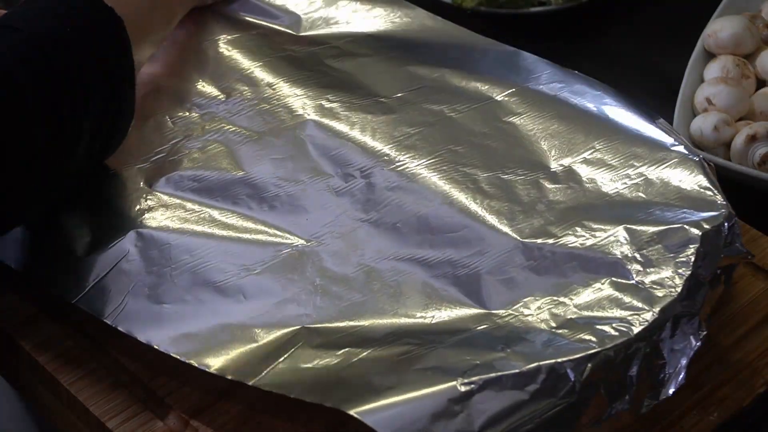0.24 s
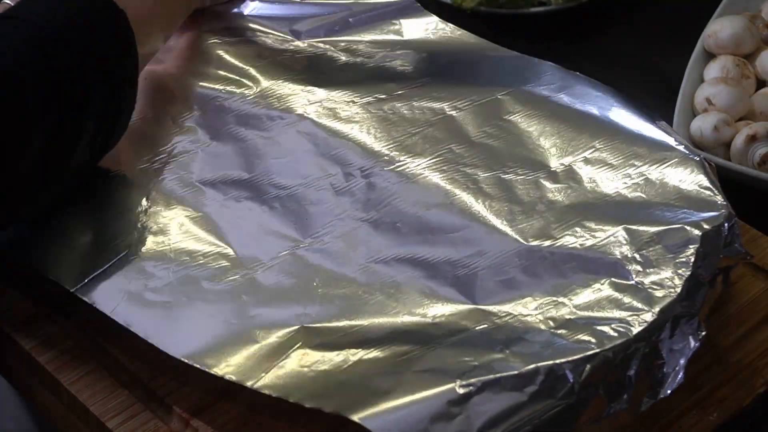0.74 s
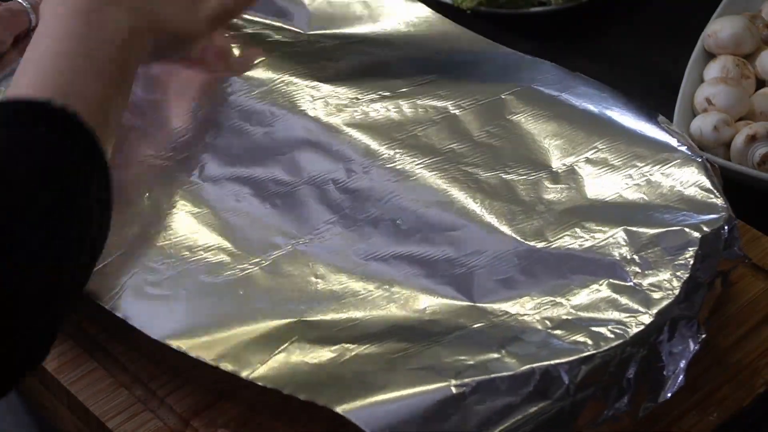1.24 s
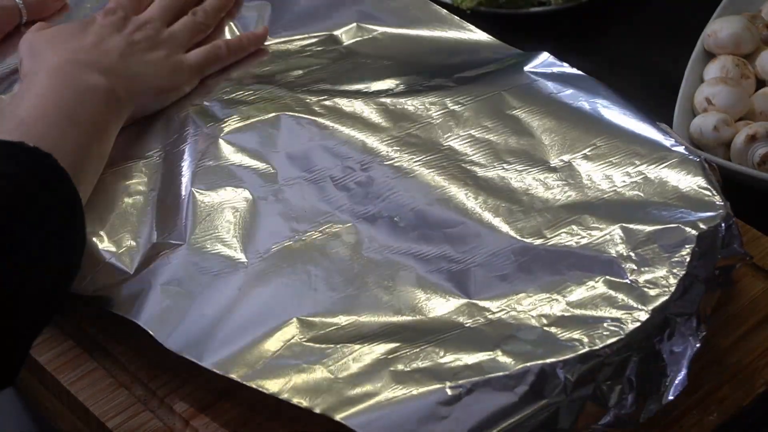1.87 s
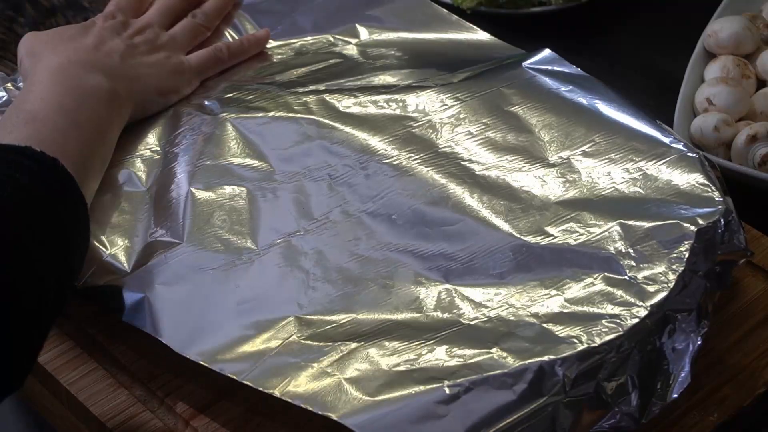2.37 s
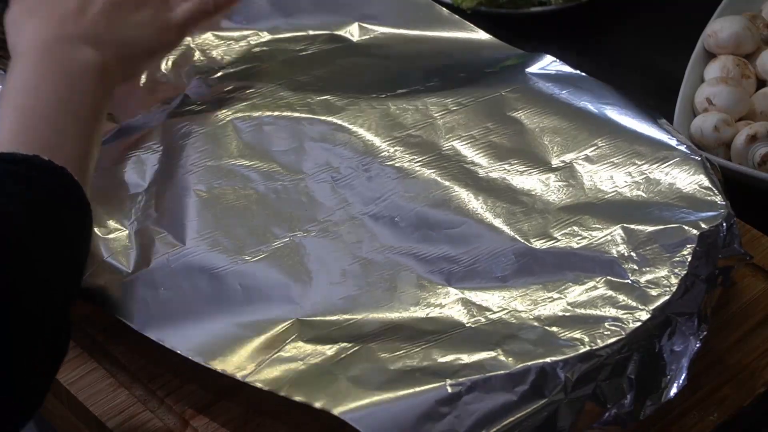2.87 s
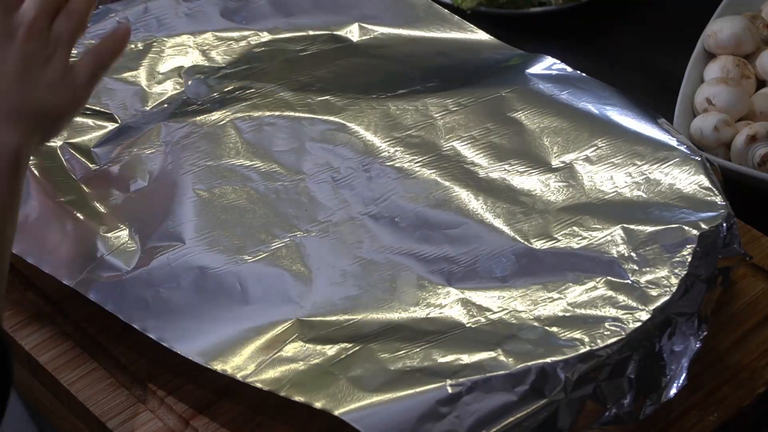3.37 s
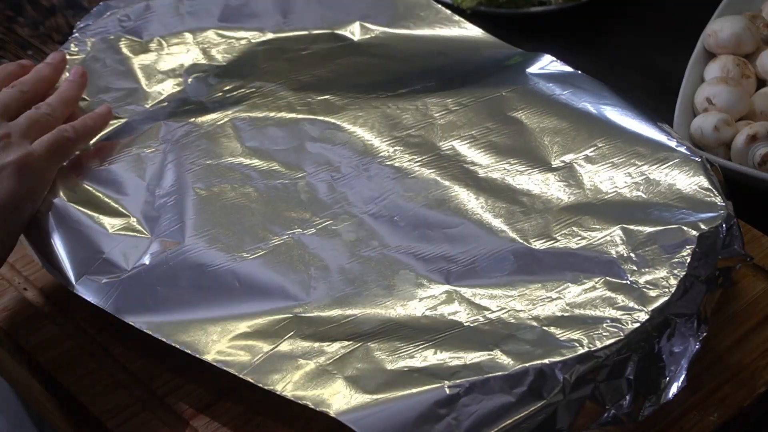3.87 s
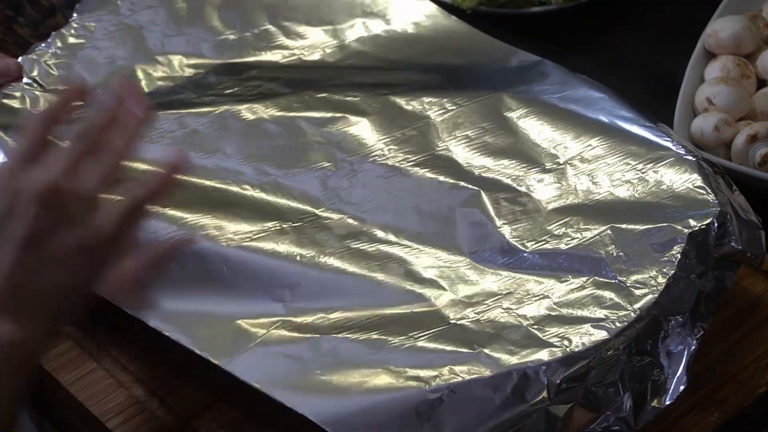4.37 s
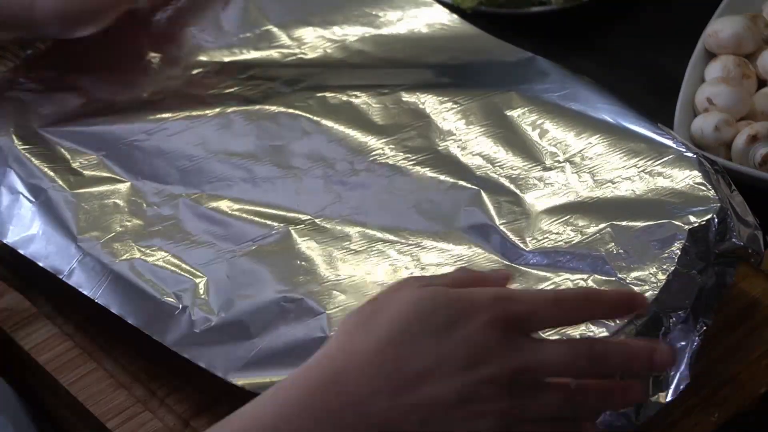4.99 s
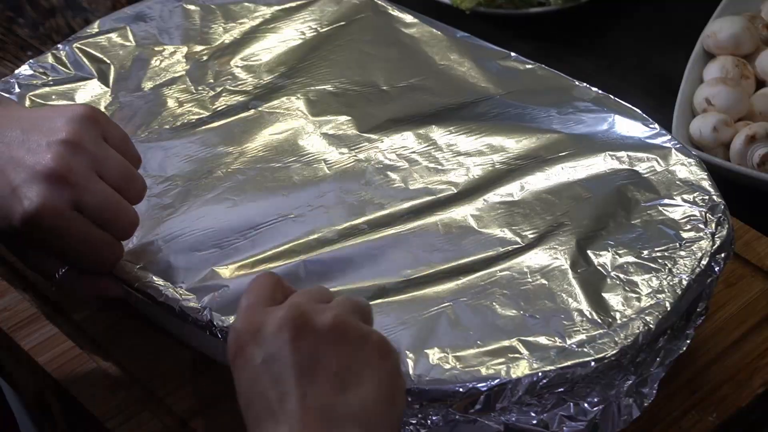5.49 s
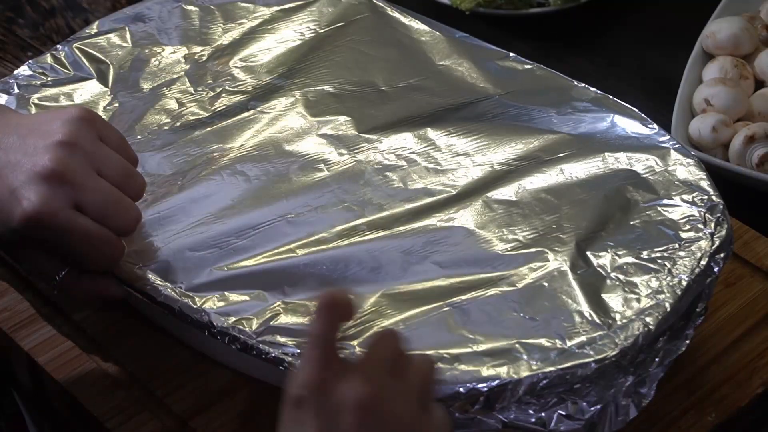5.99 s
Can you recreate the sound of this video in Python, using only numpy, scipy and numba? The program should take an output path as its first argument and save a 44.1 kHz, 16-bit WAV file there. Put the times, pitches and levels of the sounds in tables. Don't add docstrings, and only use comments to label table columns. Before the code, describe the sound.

Aluminium foil crackles and crinkles sharply in uneven bursts as hands spread and crimp it over a dish, above a low fridge hum.

```python
import sys
import numpy as np
from scipy import signal
from scipy.fft import rfft, irfft
from scipy.io import wavfile
from scipy.ndimage import uniform_filter1d
from numba import njit

SR = 44100
rng = np.random.default_rng(int(sys.argv[2]) if len(sys.argv) > 2 else 0)


def output_pcm(signal):
    pcm = np.clip(np.atleast_2d(signal).T, -1, 1) * 32767
    wavfile.write(sys.argv[1], SR, np.round(pcm).astype(np.int16))


def volts(x):
    e = np.asarray(x, float) / 20
    return 10 ** e


N = 275625

FIRM_DB = -25


def level(x, db):
    return x * volts(db) / np.sqrt(np.mean(x ** 2))


def colour(x, shape):
    hz, db = np.transpose(shape)
    bins_hz = np.fft.rfftfreq(x.shape[-1], 1 / SR)
    gain = volts(np.interp(np.log(bins_hz + 1), np.log(hz), db))
    return irfft(rfft(x) * gain, x.shape[-1])


def walk(rate):
    hold = int(SR / rate)
    steps = np.repeat(rng.standard_normal(N // hold + 1), hold)
    return 0.7 * uniform_filter1d(uniform_filter1d(steps, hold), hold)[:N]


# f/Hz, level/dB re motor line, phase waver/cycles
MOTOR_LINES = [
    (56.6, -3.5, 0.034),
    (108, -14, 0.81),
    (190, -15.5, 0.58),
    (239.4, -19, 0.3),
]
# f/Hz, level/dB per Hz
ROOM_NOISE = [(20, -25), (40, -6), (75, -3), (105, 5.5), (170, -7.5), (200, 2), (330, -5), (450, -6),
              (630, -5), (900, -6), (3000, -56), (7000, -57), (16500, -44)]
# t/s, motor line level/dB
BACKGROUND_GAIN = [(0.0, -45.5), (0.64, -44.5), (0.79, -50), (1.24, -49), (1.4, -48.5), (3.12, -47),
                   (3.31, -42.5), (3.79, -47), (4.42, -46.5), (4.53, -52.5), (5.05, -48.5), (5.17, -60.5),
                   (5.26, -43.5), (5.64, -48), (6.25, -46)]


def kitchen():
    t = np.arange(N) / SR
    hum = np.zeros(N)
    for hz, db, waver in MOTOR_LINES:
        strength = volts(db + 3.0 + 1.3 * walk(5.35))
        hum += strength * np.sin(2 * np.pi * (hz * t + waver * walk(10)))
    mid, side = colour(rng.standard_normal((2, N)), ROOM_NOISE)
    side = signal.lfilter(*signal.butter(1, 2500, "high", fs=SR), side)
    noise = level(mid + side * np.array([[1], [-1]]), -4.5)
    return volts(np.interp(t, *np.transpose(BACKGROUND_GAIN))) * (hum + noise)


GRIP_DB_PER_S, LET_GO_DB_PER_S = 900, 202
REST_DB, REST_END_S, REST_END_DB = -42.5, 4, -63
# start t/s, length/s, crackle level at start/dB, crackle level at end/dB
HAND_STROKES = [(0, 0.033, -34, -39), (0.053, 0.14, -33.5, -23.5), (.40, 0.098, -40, -37),
                (0.557, .03, -37, -38), (0.626, 0.21, -22, -32), (0.841, 0.062, -24, -28.5),
                (.97, 0.18, -32.5, -39.5), (1.236, .1, -27, -28), (1.36, 0.4, -25.5, -26),
                (1.716, 0.32, -28.5, -32), (2.05, 0.11, -23, -23), (2.211, 0.081, -31.5, -24),
                (2.414, 0.18, -40.5, -28.5), (2.657, 0.043, -37, -25), (2.845, 0.11, -30.5, -36.5),
                (3.034, 0.069, -44, -36), (3.169, 0.15, -46, -30.5), (3.328, 0.08, -39, -35),
                (3.439, 0.058, -47, -29.5), (3.563, 0.31, -32.5, -26), (3.914, 0.45, -26, -25.5),
                (4.406, 0.15, -25.5, -22), (4.578, .22, -28.5, -26), (4.997, 0.055, -37.5, -20.5),
                (5.064, 0.26, -22.5, -26), (5.36, .16, -30.5, -32), (5.544, 0.12, -24, -26.5),
                (5.725, 0.18, -29.5, -28), (5.95, 0.11, -26.5, -34), (6.241, 0.029, -26.5, -29)]


def hands():
    t = np.arange(N) / SR
    db = np.where(t < REST_END_S, 1. * REST_DB, REST_END_DB)
    for s, length, first_db, last_db in HAND_STROKES:
        glide = np.interp(t, [s, s + length], [first_db, last_db])
        grip = GRIP_DB_PER_S * (s - t).clip(0)
        let_go = LET_GO_DB_PER_S * (t - s - length).clip(0)
        db = np.maximum(db, glide - grip - let_go)
    return uniform_filter1d(db, size=400)


def creases():
    count = 120000
    when, turn, place, side = rng.random((count, 4)).T
    at = 20 + (when * N).astype(int)
    size = np.sign(turn - .5) * volts(2.3 * rng.exponential(size=count).clip(0, 6))
    lead = np.round(np.tan(np.pi * (place - .5)) * 0.32).clip(-12, 12).astype(int)
    clicks = np.zeros((2, N + 40))
    np.add.at(clicks[0], at, size * volts(3.8 * (side - .5)))
    np.add.at(clicks[1], at + lead, size / volts(4.6 * (side - .5)))
    return level(clicks[:, 20:N + 20], 0)


@njit
def ring(start, hz, t60, left, right):
    out = np.zeros((2, N))
    for k in range(len(start)):
        p, z = np.exp((2j * np.pi * hz[k] - np.log(1000) / t60[k]) / SR), 1 + 0j
        for i in range(start[k], min(N, start[k] + int(t60[k] * SR))):
            out[0, i] += (z * left[k]).imag
            out[1, i] += (z * right[k]).imag
            z *= p
    return out


def facets():
    count = 30000
    when, size, cycles, place = rng.random((count, 4)).T
    hz = 400 + 16600 * size
    t60 = np.minimum(5 * volts(-6 * np.log(1 - cycles)) / hz, .03)
    gain = volts(0.79 * rng.exponential(size=count)) / np.sqrt(t60)
    lead = np.exp(2j * np.pi * hz * 1.8e-5 * (2 * place - 1))
    return level(ring((when * N).astype(int), hz, t60, gain * lead, gain / lead), 0)


FOLD_ATTACK_S, FOLD_DECAY_S, FOLD_DB, FOLD_TREBLE_DB = 0.006, 0.061, -7, 9
TICK_ATTACK_S, TICK_DECAY_S = .0012, 0.013
LESSER_FOLDS, LESSER_DB, LESSER_SCATTER_DB, LESSER_SLOPE = 150, 2, 1.5, 0.18
# t/s, peak level/dB, treble
# level/dB re peak
LARGER_FOLDS = [(0.0543, -13, -27), (0.0976, -11.5, -11.5), (0.138, -9, -15), (0.3037, -24.5, -12),
                (0.3666, -31.5, -13), (0.39, -27, -19), (0.441, -16, -13), (0.5545, -21, -10),
                (0.571, -16.5, -11), (0.611, -4, -12.5), (0.8116, -16, -12), (0.8345, -17, -18),
                (0.9492, -16, -17), (0.9844, -15, -8.5), (1.117, -16.5, -12), (1.2361, -19, -7),
                (1.259, -8.5, -14), (1.4875, -5.5, -9), (1.6252, -4.5, -12), (1.679, -9, -9),
                (1.82, -8.5, -15), (1.914, -11, -13.5), (2.0118, -13.5, -18),
                (2.0144, -17, -19), (2.0383, -17, -25), (2.0563, -5.5, -22), (2.2344, -19, -1),
                  (2.384, -25.5, -6), (2.4155, -30, -5), (2.451, -20.5, -10), (2.4808, -18, -17),
                  (2.535, -15.5, -8), (2.5866, -12.5, -12), (2.6245, -17.5, -8), (2.6514, -11.5, -10.5),
                  (2.697, -9, -7), (2.841, -25.5, -25.5), (2.9236, -23, -2.5), (3.0645, -17.5, -24),
                  (3.1807, -21, -7), (3.2291, -17, -17), (3.2645, -17, -15), (3.2945, -10.5, -17),
                  (3.3584, -12, -18), (3.4405, -13.5, -15), (3.4825, -11, -12.5), (3.5549, -15.5, -10.5),
                  (3.6053, -9.5, -12), (3.7379, -15, -10), (3.7654, -9.5, -17),
                (3.818, -6, -12), (3.924, -17, -13), (3.947, -9.5, -8), (3.9994, -8.5, -7),
                  (4.0697, -13, -14), (4.2358, -15, -7), (4.397, -8, -10), (4.6549, -11, -11),
                  (4.6923, -19, -5), (4.9896, -33, -12), (5.0056, -28, -16.5), (5.03, -8.5, -18.5),
                  (5.2406, -15, -4), (5.3444, -6.5, -14), (5.4133, -9.5, -11), (5.5434, -14, -7),
                  (5.7304, -20, -5), (5.7733, -22.5, 1), (5.9559, -12, -8), (6.224, -13.5, -14),
                (0.6544, -3.5, -15), (0.6894, -11.5, -8), (0.7274, -15, -7.5), (0.8529, -18.5, -12),
                (1.017, -19.5, -8), (1.0674, -19, -23), (1.3784, -16, -14), (1.3974, -10, -14),
                (1.5894, -9, -15), (2.0864, -11, -11), (2.1424, -9.5, -17), (2.2765, -32, 12),
                (3.6194, -9.5, -9), (3.6714, -16, -9), (3.7044, -22, -4), (3.856, -8, -14),
                (4.0984, -8, -11), (4.1174, -9, -10), (4.157, -7, -17), (4.2684, -12.5, -6),
                (4.3244, -12, -14), (4.4604, -12, -12), (4.5494, -21, -14), (5.1094, -9, -13),
                (5.2887, -6, -13), (5.307, -5.5, -10), (5.4844, -18, -15), (5.5814, -16, -2),
                (5.8752, -12, -12), (5.971, -7.5, -7)]
# t/s (negative counts back from the end),
# peak level/dB, treble level/dB re peak
LONE_TICKS = [(.054, -22, -5), (.072, -27, -7), (-3, -22, 0), (6, -20.5, -2), (.304, -34, 8), (-3, -32, -2),
              (.611, -15, -9), (.7662, -30, -6), (1.431, -24, -4), (1.865, -30, 0), (-3, -24, 4),
              (2.8415, -27, 2), (3.5, -32, -4), (3.182, -37, 3), (3.39, -30, -4), (3.443, -27, 0),
              (3.474, -33, -2), (5, -25, 5), (3.5, -31, 0), (6.0646, -33, 0)]


def effort(steady_db, small_db):
    rustle_db = np.array([steady_db, steady_db + small_db + 0.5])
    power = volts(rustle_db + 2.0 + 1.3 * walk(30)) ** 2
    t = np.arange(int(.15 * SR)) / SR
    when, size, bright = rng.random((LESSER_FOLDS, 3)).T
    at = (when * N).astype(int)
    lesser_db = steady_db[at] + LESSER_SLOPE * (steady_db[at] - FIRM_DB) + LESSER_DB
    lesser_db = lesser_db - LESSER_SCATTER_DB * np.log(1 - .9 * size)
    folds = list(zip(at / SR, lesser_db, small_db[at] + 12 * (bright - .5)))
    for s, db, treble_db in LARGER_FOLDS:
        folds.append((s, db + FOLD_DB, treble_db + FOLD_TREBLE_DB))
    kinds = ((folds, FOLD_ATTACK_S, FOLD_DECAY_S), (LONE_TICKS, TICK_ATTACK_S, TICK_DECAY_S))
    for rows, attack_s, t60 in kinds:
        burst = np.minimum(t / attack_s, 1) * 1000 ** (-2 * t / t60)
        for s, peak_db, bright_db in rows:
            start = int(s * SR)
            peak = volts(peak_db + np.array([[0], [bright_db]])) ** 2
            power[:, start:start + len(t)] += peak * burst[:N - start]
    return power


# t/s, large-facet level/dB
LOOSE_SHEET = [(0, -1), (.2, 1.5), (.5, 2), (.63, 5.5), (.72, -1), (1.5, 1), (2.0, 4), (2.4, 3), (2.75, 1),
               (3.15, 3), (3.3, -2), (3.52, -11), (3.65, 1), (4.5, -1), (5.3, 1.5), (5.6, -0.5), (6.1, 0),
               (6.25, -3.5)]


def slack(steady_db):
    loose_db = np.interp(np.arange(N) / SR, *np.transpose(LOOSE_SHEET))
    return -10 - 0.12 * (steady_db - FIRM_DB) + loose_db


# f/Hz, level/dB per Hz
FOIL_SPECTRUM = [(250, -22), (400, -21), (480, -9), (700, -11), (1100, -6.5), (1800, -6.5), (3000, -4.5),
                 (5500, -2), (9000, 0), (13500, 0.5), (16600, -5)]


def foil(power, large_db):
    sheet = level(colour(creases() + volts(-11.5) * facets(), FOIL_SPECTRUM), 2.55)
    low = colour(sheet, [(1300, 0), (2000, -5), (3500, -40)])
    high = colour(sheet, [(3000, -40), (6500, -6), (10000, 0)])
    middle, treble = np.sqrt(power)
    lean = volts(np.array([[-.9], [.9]]))
    return middle * (volts(large_db + 9.0) * low + sheet - low - high) + treble * high * lean


KNOCK_DECAY_S, KNOCK_HZ, KNOCK_SLOPE = 0.12, 300, -0.51
# t/s, peak level/dB, first mode f/Hz, second mode f/Hz, second mode level/dB re
DISH_KNOCKS = [(.62, -22, 328, 570, -0.5), (.645, -24, 283, 537, -4), (.67, -56, 75, 130, -3),
               (2.151, -23, 341, 573, 0.5), (2.215, -39, 130, 270, -3), (3.119, -35, 95.5, 192.6, 1),
               (3.14, -39.5, 268, 337, 0), (3.066, -39, 1240, 1450, -3), (3.23, -22, 2730, 1250, -19),
               (3.262, -31, 1750, 1250, -6), (5.24, -52, 90, 199, 4), (3.26, -44.5, 312, 190, 6),
               (.441, -33, 800, 1000, -6), (.553, -35, 830, 700, -5), (.573, -38, 880, 2210, 6),
               (.611, -33, 232, 2150, 7), (3.08, -33, 1450, 2640, -2), (3.299, -20, 3350, 4280, -8),
               (.7, -45, 300, 180, -2), (6.08, -36, 392, 290, -2), (6.1, -39, 270, 485, 0),
               (6.125, -36, 580, 333, -12), (6.217, -32, 2470, 1900, -29.5), (6.24, -25, 2300, 1720, -12)]


def knocks():
    s, db, low_hz, high_hz, high_db = np.tile(np.transpose(DISH_KNOCKS), 3)
    t60 = KNOCK_DECAY_S * (low_hz / KNOCK_HZ) ** KNOCK_SLOPE
    neighbour = np.arange(len(s)) >= len(DISH_KNOCKS)
    late, detune = rng.random((len(s), 2)).T * neighbour
    gain = volts(np.r_[db, db + high_db] - 11.4 * np.tile(late > 0, 2)) + 0j
    hz = np.r_[low_hz, high_hz] * np.tile(1 + 0.192 * np.sin(2 * np.pi * detune), 2)
    start = (np.tile(s + .014 * late, 2) * SR).astype(int)
    t60 = np.r_[t60, .7 * t60]
    blows = ring(start, hz, t60, gain, gain) - ring(start, hz, 2.8 / hz, gain, gain)
    return signal.lfilter(*signal.butter(1, 3200, fs=SR), blows)


def tail(x, t60, dull_hz, wide_hz, count):
    out = np.zeros((2, N + SR))
    t = np.arange(int(min(t60, .9) * SR)) / SR
    hop = N // count + 1
    dull = signal.butter(1, dull_hz, fs=SR)
    wide = signal.butter(1, wide_hz, "high", fs=SR)
    for i in range(0, N, hop):
        noise = rng.standard_normal((2, len(t)))
        mid, side = signal.lfilter(*dull, noise) * 1000 ** (-t / t60)
        side = signal.lfilter(*wide, side)
        response = np.array([mid + side, mid - side]) / np.sqrt(np.sum(mid ** 2))
        wet = signal.fftconvolve(x[None, i:i + hop], response, axes=1)
        out[:, i:i + wet.shape[1]] += wet
    return out[:, :N]


def scene():
    steady_db = hands()
    small_db = -3 + 0.41 * (steady_db - FIRM_DB)
    snaps = foil(effort(steady_db, small_db), slack(steady_db))
    shimmer = tail(snaps.mean(axis=0), 0.068, 21400, 6300, count=300)
    sheet = volts(0.5) * snaps + volts(-9.5) * shimmer
    near = volts(np.array([[-.4], [.4]])) * sheet + knocks()
    room = tail(near.mean(axis=0), 0.45, 7400, 2900, count=12)
    return near + volts(-12.5) * room + kitchen()


def roll_off(x):
    return signal.sosfilt(signal.butter(12, 15730, fs=SR, output="sos"), x)


def record(dry):
    peaks = np.tanh(1.777 * dry) / 1.482
    return roll_off(peaks)


dry = scene()
out = record(dry)
output_pcm(out)
```